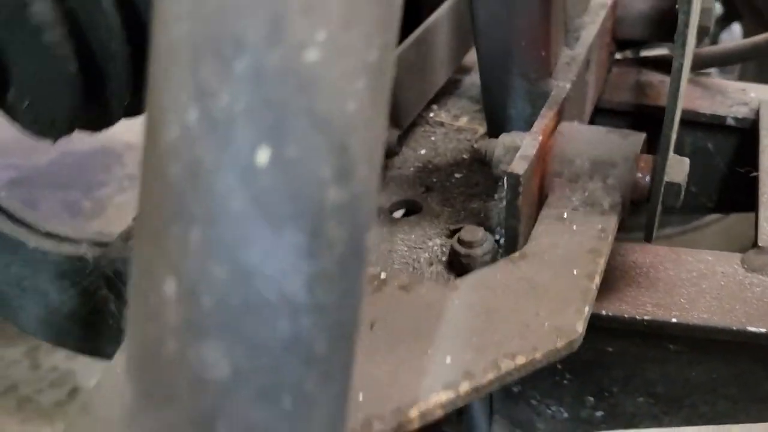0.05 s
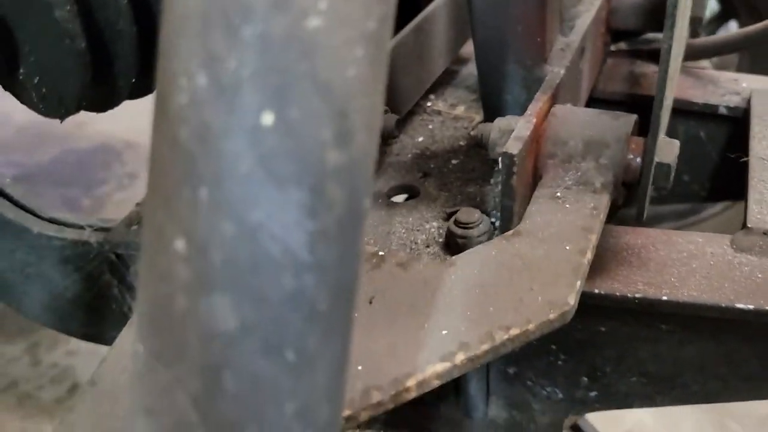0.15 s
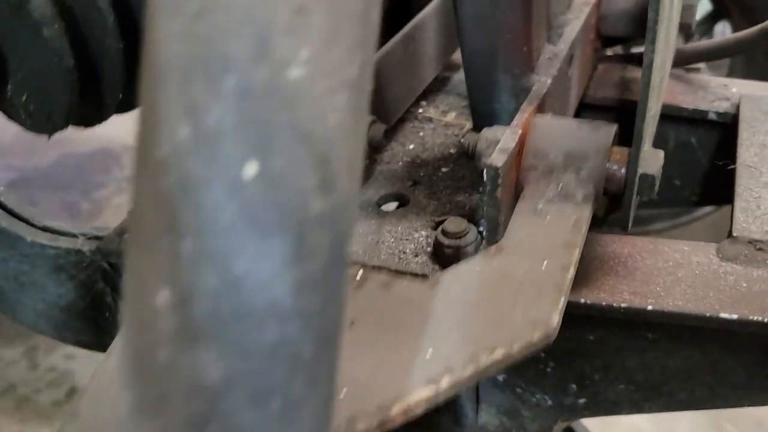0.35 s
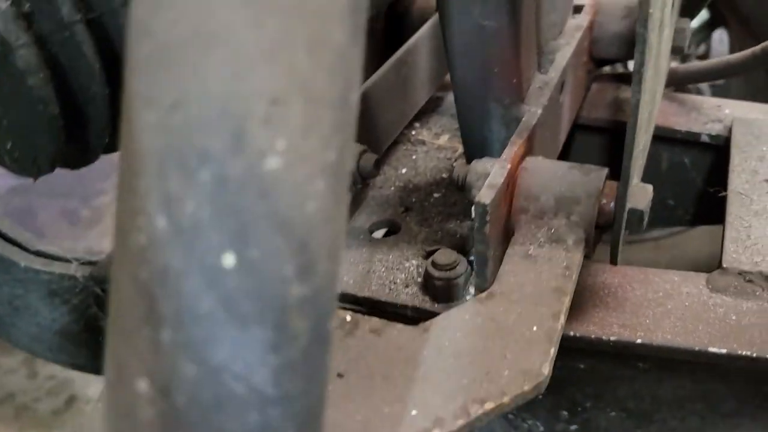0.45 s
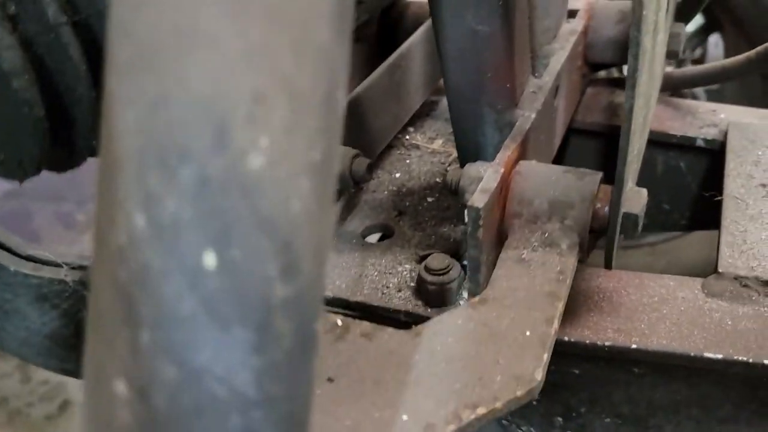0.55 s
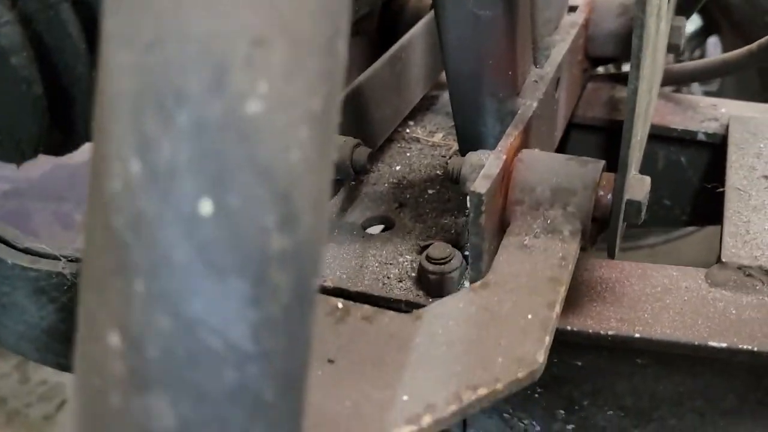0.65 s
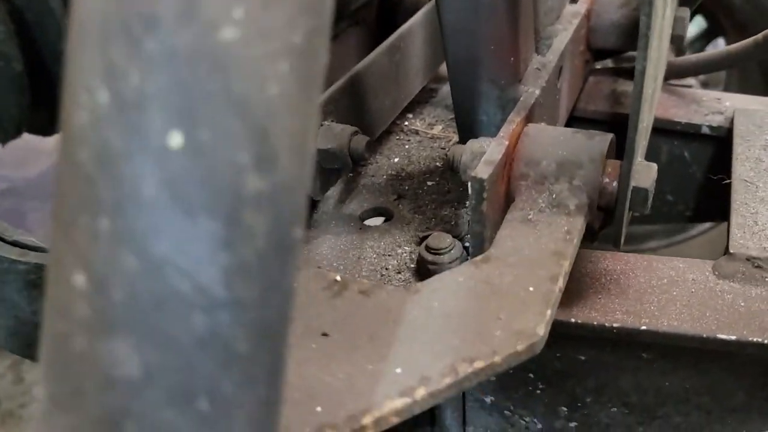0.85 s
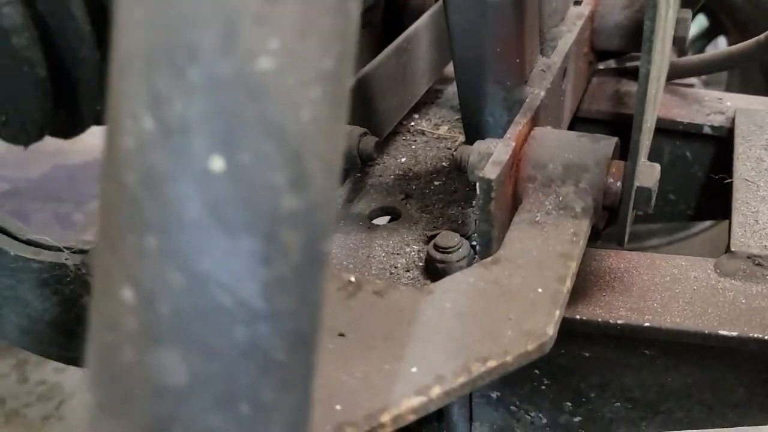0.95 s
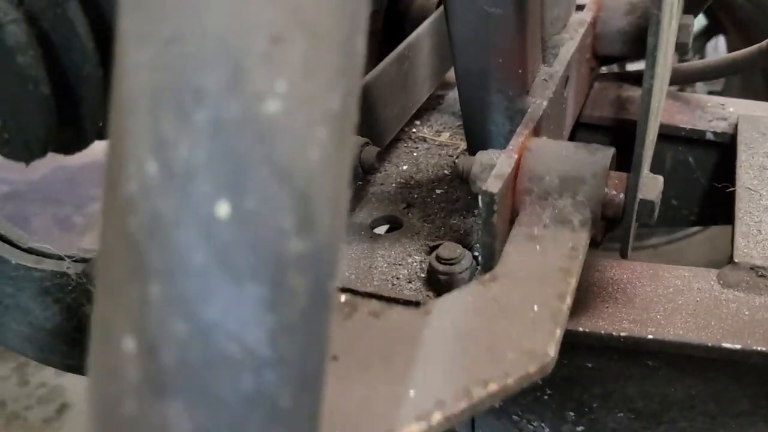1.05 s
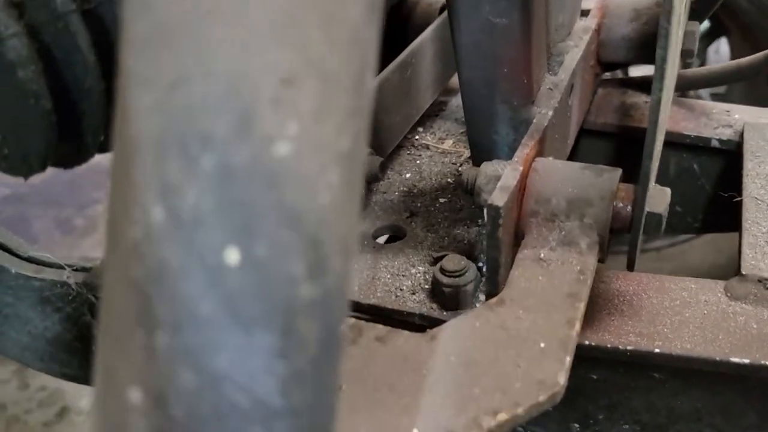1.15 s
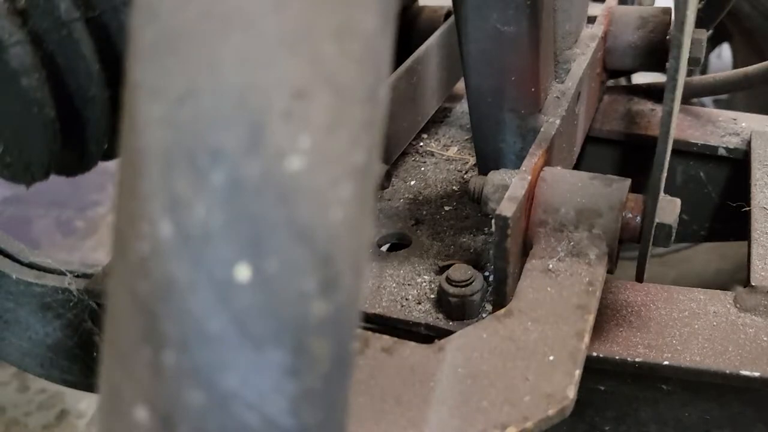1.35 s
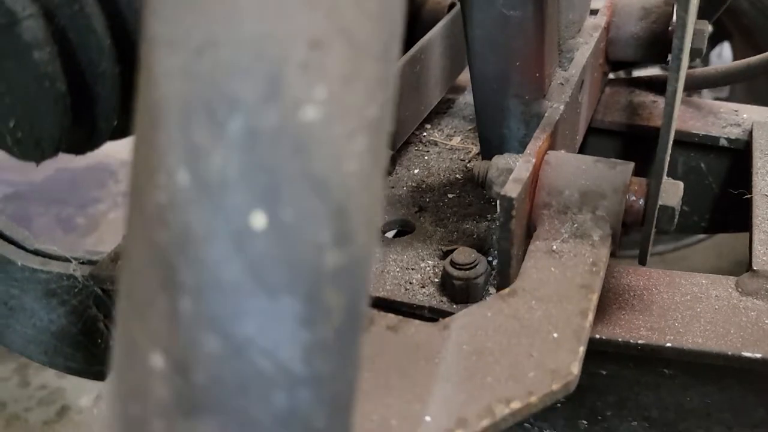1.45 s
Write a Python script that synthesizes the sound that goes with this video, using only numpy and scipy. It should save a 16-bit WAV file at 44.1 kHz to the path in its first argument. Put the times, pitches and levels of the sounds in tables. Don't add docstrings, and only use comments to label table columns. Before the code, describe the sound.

A loose steel suspension arm knocks in its worn mounts, close up. Faint rattles lead to a hard ringing clunk at 0.22 s and a bright rebound at 0.31, then rattles and rubbery thuds until 0.5. Another sharp clank lands at 0.71 with clatter to 0.84, a third slam at 0.99, softer rebound and rattles at 1.1-1.27, then near quiet over faint low rumble and short workshop reverberation.

```python
import sys
import numpy as np
from scipy import signal
from scipy.fft import rfft, irfft
from scipy.io import wavfile
from scipy.ndimage import uniform_filter1d

SR = 44100
rng = np.random.default_rng(int(sys.argv[2]) if len(sys.argv) > 2 else 0)


def boost(x):
    u = np.asarray(x, float) / 20
    return 10 ** u


def dump(signal):
    limited = np.clip(np.atleast_2d(signal).T, -1, 1)
    pcm = np.round(limited * 32767).astype(np.int16)
    wavfile.write(sys.argv[1], SR, pcm)


N = 66150
RING_LEN = 16384
RISE_S, BEAT_HZ = 0.00047, 29.4


# start in seconds, level in dB, chatter length in ms,
# skid before contact in dB, extra dense ringing in dB.
FRONT_KNOCKS = [
    (0.2187, -0.5, 3.9, -16.5, 1),
    (0.9853, 0.5, 11.9, -19, -4),
]
FRONT_HZ = [355, 530, 754, 890, 1130, 1593, 2146, 3440, 3890, 4065, 4570, 4990, 5272, 6306]
# level in dB, t60 in seconds.
FRONT_RING = [(-20, 0.38), (-16, 0.13), (-17, 0.26), (-3, 0.18), (-7.5, 0.05), (-13.5, 0.017), (-10, 0.062),
              (-7, 0.056), (-7.5, 0.095), (-0.5, 0.069), (-22, 0.0073), (-9.5, 0.021), (0.5, 0.051),
              (-2, 0.056)]
# frequency in Hz, level in dB.
FRONT_DENSE = [(120, -10.5), (300, -6), (850, -7.5), (2900, -17), (5300, -6.5), (7600, -29.5), (12700, -37),
               (16000, -51.5)]


def front_knocks():
    return knocks(FRONT_KNOCKS, FRONT_HZ, FRONT_RING, FRONT_DENSE, clear_db=0.5, dense_db=-1.5)


# start in seconds, level in dB, chatter length in ms,
# skid before contact in dB, extra dense ringing in dB.
BACK_KNOCKS = [
    (0.7144, 0.39, 0.5, -15.5, 0),
]
BACK_HZ = [759, 1130, 2008, 2713, 2890, 3440, 3774, 4188, 4969, 5280, 6422, 7364]
# level in dB, t60 in seconds.
BACK_RING = [(-12.5, 0.18), (0.5, 0.054), (-4.5, 0.046), (-6.5, 0.034), (-9, 0.048), (0, 0.029),
             (-10.5, 0.064), (-3.5, 0.051), (-18.5, 0.076), (-11.5, 0.049), (-13.5, 0.033), (-7.5, 0.031)]
# frequency in Hz, level in dB.
BACK_DENSE = [(100, -9), (200, -10), (1100, -4), (3500, -12.5), (6000, -15.5), (8200, -37.5),
              (13200, -31.5), (16000, -46.5)]


def back_knocks():
    return knocks(BACK_KNOCKS, BACK_HZ, BACK_RING, BACK_DENSE, clear_db=1, dense_db=-4)


# start in seconds, level in dB, chatter length in ms,
# skid before contact in dB, extra dense ringing in dB.
REBOUNDS = [
    (0.3082, -1.3, 1.9, -15, -1.5),
]
LATE_REBOUNDS = [
    (1.0951, -11, 9, -32, 0.013),
]
REBOUND_HZ = [400, 1992, 2690, 3440, 3700, 4990, 5240, 7230, 12300]
# level in dB, t60 in seconds.
REBOUND_RING = [(-15.5, 0.26), (-11.5, 0.063), (-13, 0.058), (-12.5, 0.064), (-6.5, .04), (2.5, 0.02),
                (-7.5, 0.053), (-1, 0.027), (-5, .03)]
# frequency in Hz, level in dB.
REBOUND_DENSE = [(170, -8.5), (450, -3.5), (2000, -15), (5100, -13), (8900, -32), (12700, -24),
                 (15000, -30.5), (16000, -46.5)]
LATE_DENSE = [(170, -7), (450, -0.5), (2000, -11.5), (5100, -15), (8900, -41), (12700, -28.5), (15000, -33),
              (16000, -59)]


def rebounds():
    early = knocks(REBOUNDS, REBOUND_HZ, REBOUND_RING, REBOUND_DENSE, clear_db=1, dense_db=1.5)
    late = knocks(LATE_REBOUNDS, REBOUND_HZ[:-1], REBOUND_RING[:-1], LATE_DENSE, clear_db=1, dense_db=1.5)
    return early + late


def knocks(events, pitches, ring, colour, clear_db, dense_db):
    out = np.zeros((2, N))
    hz, (db, t60) = np.array(pitches, float), np.array(ring, float).T
    t60 = np.clip(t60, 0.02, np.minimum(780 / hz, 0.3))
    colour_db = curve(colour, np.fft.rfftfreq(RING_LEN, 1 / SR))
    for s, level_db, ms, skid_db, extra_db in events:
        clear = modes_ring(hz, db, t60)
        clear = unit(ports(clear, 0.33 * np.roll(clear, 40)))
        dense = struck(frame(colour_db), ms)
        add(out, s, boost(level_db) * (boost(clear_db) * clear + boost(dense_db + extra_db) * dense))
        skid(out, s, level_db + skid_db)
    return out


def skid(track, contact_s, level_db):
    skid_s, rise_s, hz = 0.014, 0.015, 4000
    t = np.arange(int(skid_s * SR)) / SR
    scrape = rng.standard_normal((2, len(t))) * np.exp((t - skid_s) / rise_s) * t / skid_s
    scrape = np.pad(scrape, ((0, 0), (0, 400)))
    band = signal.butter(3, [hz * 0.79, hz * 1.37], "band", fs=SR)
    scrape = signal.lfilter(*band, scrape)
    add(track, contact_s - skid_s, boost(level_db) * unit(ports(*scrape)))


def modes_ring(hz, db, t60):
    t = np.arange(RING_LEN) / SR
    twin = hz + BEAT_HZ * rng.standard_normal(len(hz))
    tone = np.sin(2 * np.pi * hz[:, None] * t) + 0.48 * np.sin(2 * np.pi * twin[:, None] * t)
    decay = boost(-60 * t / t60[:, None])
    return np.sum(boost(db)[:, None] * tone * decay, axis=0) * (1 - np.exp(-t / RISE_S))


# frequency in Hz, t60 in seconds.
FRAME_T60 = [(150, 0.22), (800, 0.11), (2500, 0.076), (6000, 0.023), (14000, 0.081)]


def frame(colour_db):
    linger_db, linger_times = -9.5, 4.85
    t, f = np.arange(RING_LEN) / SR, np.fft.rfftfreq(RING_LEN, 1 / SR)
    noise = rfft(rng.standard_normal((2, RING_LEN))) * boost(colour_db)
    out = 0
    for hz in 100 * 2 ** np.arange(0, 7.6, 0.5):
        t60 = curve(FRAME_T60, hz)
        band = np.clip(1 - 2 * np.abs(np.log2(np.maximum(f, 1) / hz)), 0, 1)
        decay = boost(-60 * t / t60) + boost(linger_db - 60 * t / t60 / linger_times)
        out = out + irfft(noise * band) * decay / np.sqrt(t60)
    return out * (1 - np.exp(-t / RISE_S))


def chatter(ms):
    t = np.arange(4096) / SR
    x = rng.standard_normal(4096) ** 3 * np.exp(-t * 2000 / ms)
    x *= 0.41 / np.sqrt(np.sum(x ** 2))
    x[0] = min(2.55 / ms, 1)
    return x


def struck(response, ms):
    rung = signal.fftconvolve(response, chatter(ms)[None], axes=1)[:, :RING_LEN]
    return unit(ports(*rung))


# start in seconds, level in dB, contact pitch in Hz, chatter length in ms,
# spread in octaves.
RATTLES = [(.001, -21, 1480, 31, 1.9), (0.051, -25.5, 2500, 104, 1.6), (.082, -26.5, 3130, 2.8, 0.48),
           (.170, -36, 4460, 5, .8), (.363, -11.5, 2480, 13, 1.5), (.372, -16.5, 9000, 3.6, 1.1),
           (.417, -18, 3070, 11, 1), (0.455, -26, 4540, 16, 0.98), (0.485, -26, 2000, 4.9, 0.6),
           (.540, -44, 11000, 8.4, 0.78), (.620, -26, 1490, 5.16, 2.7), (0.658, -27.5, 6300, 18, 1),
           (0.769, -11.5, 7500, 4.8, 1.2), (0.807, -14, 1700, 14, 0.79), (.838, -25, 1773, 23, 1.6),
           (1.139, -17, 753, 2, 0.58), (1.157, -15.5, 2750, 5.7, 1.45), (1.185, -17.5, 3000, 16, 1.7),
           (1.196, -22, 4800, 8.6, 0.82), (1.435, -46, 3500, 15, 1.55), (1.472, -45, 3000, 8.3, 1.13),
           (1.490, -45.5, 6000, 8, 1.2), (0.772, -20, 2200, 3.3, 0.5), (0.624, -31.5, 1000, 8, 0.67),
           (1.246, -31, 4000, 5.3, 0.6), (1.273, -30.5, 4620, 5.3, 0.65)]
# frequency in Hz, level in dB.
RATTLE_COLOUR = [(150, -26), (800, 5.5), (1950, -5.5), (3000, -7), (4950, -8.5), (9000, -24.5),
                 (12500, -16.5), (16000, -23)]
# pitch in Hz, width in Hz, lift in dB.
RATTLE_PLATES = [(830, 150, 2), (1954, 320, 7.5), (2727, 200, 6), (3460, 250, 4.5), (4880, 270, 1),
                 (6600, 710, 10)]


def rattles():
    out, f = np.zeros((2, N)), np.fft.rfftfreq(RING_LEN, 1 / SR)
    plates_db = sum(db / (1 + (2 * (f - hz) / width) ** 2) for hz, width, db in RATTLE_PLATES)
    for s, level_db, hz, ms, octaves in RATTLES:
        distance = np.log2(np.maximum(f, 1) / hz) / octaves
        near_db = np.maximum(-4.3 * distance ** 2, -32)
        touch = struck(frame(curve(RATTLE_COLOUR, f) + near_db + plates_db), ms)
        add(out, s, boost(level_db - 1) * touch)
    return out


# start in seconds, level in dB, pitch in Hz, t60 in seconds.
PINGS = [(0.362, -16.5, 4150, 0.025), (0.364, -14.5, 1884, 0.033), (.456, -26, 4910, 0.038),
         (0.589, -27, 920, 0.071), (.622, -29, 4990, 0.064), (.660, -42, 3600, .03),
         (0.66, -43, 4700, 0.025), (.805, -12, 1970, 0.03), (1.156, -15, 1901, 0.04),
         (1.204, -27.5, 4970, .03), (.2215, -13, 840, 0.14), (.226, -18, 1130, 0.1),
         (.224, -23.5, 546, .09), (.716, -19, 794, 0.17), (1.186, -27, 2587, 0.067),
         (1.157, -28, 4000, .03), (.221, -36, 1270, 0.074), (.223, -15, 1566, .09),
         (.228, -25.5, 371.3, 0.25), (.278, -26, 338, 0.063), (.988, -12, 830, 0.057),
         (1.097, -19, 2027, 0.075), (.44, -31.5, 830, .15), (.42, -33.5, 274, 0.083),
         (.309, -21.5, 5073, 0.27), (.372, -17.5, 817, 0.067), (.478, -36, 4980, 0.076),
         (.771, -27, 4800, 0.15), (.772, -29.5, 6670, 0.29), (.813, -23, 367.5, 0.066),
         (1.097, -26.5, 5280, 0.072), (1.139, -20.5, 818, 0.051), (1.153, -33, 5140, 0.026),
         (1.196, -27, 5000, 0.041), (1.246, -35, 4970, 0.04), (1.273, -53, 5000, 0.096),
         (1.436, -65.5, 5080, 0.075)]


def pings():
    out, t = np.zeros((2, N)), np.arange(RING_LEN) / SR
    for s, level_db, hz, t60 in PINGS:
        ping = modes_ring(np.array([1. * hz]), np.zeros(1), np.array([t60]))
        ping = ping * (1 - np.exp(-t / 0.0013))
        add(out, s, boost(level_db) * unit(ports(ping, 0 * ping)))
    return out


# start in seconds, level in dB, pitch in Hz, length in ms.
TICKS = [(0.31, -12, 12000, 2.2), (.7705, -20.5, 7700, 5.9), (1.07, -29, 10000, 1),
         (1.134, -35, 12000, 4.6), (1.157, -26.5, 19000, 3.7), (1.185, -28, 17000, 3),
         (.367, -24, 13000, 4), (.90, -47, 12000, 30), (1.44, -56.5, 11500, 25), (1, -37.5, 6900, 5),
         (1.273, -39, 6900, 4), (1.1, -51, 5000, 2.8)]


def ticks():
    out, t = np.zeros((2, N)), np.arange(2048) / SR
    for s, level_db, hz, ms in TICKS:
        burst = rng.standard_normal((2, 2048)) * np.exp(-t * 1000 / ms)
        band = signal.butter(1, [hz * 0.57, min(hz * 1.3, 16000)], "band", fs=SR)
        burst = signal.lfilter(*band, burst)
        add(out, s, boost(level_db) * unit(ports(*burst)))
    return out


# start in seconds, level in dB, pitch in Hz, t60 in seconds.
THUDS = [(0.31, -15.5, 177, 0.12), (0.337, -6, 163, 0.042), (0.392, -18, 74, 0.058),
         (0.418, -26, 68, 0.041), (.432, -22, 67, 0.18), (.93, -30.5, 100, 0.087), (0.717, -23, 174, 0.11),
         (0.813, -29, 98, 0.034), (1.11, -20.5, 164, 0.12), (1.14, -22, 166.5, 0.21),
         (1.169, -24, 100, 0.16), (1.224, -23, 84, 0.059)]


def thuds():
    out, t = np.zeros(N), np.arange(RING_LEN) / SR
    for s, level_db, hz, t60 in THUDS:
        blow = np.sin(2 * np.pi * hz * t) * (1 - np.exp(-t / 0.0058))
        add(out, s, boost(level_db - 60 * t / t60) * blow)
    return out


# time in seconds, level in dB.
SWAY = [(0.0, -33), (0.06, -35), (0.228, -45), (0.43, -25.5), (0.466, -39.5), (0.706, -41), (0.768, -29),
        (1.047, -51.5), (1.158, -25.5), (1.5, -52.5)]
# pitch in Hz, level in dB, t60 in seconds.
SWAY_MODES = [(32.7, -22, 0.051), (51.7, -3, 0.32), (63, -11.5, 0.15), (82.7, -3.5, 0.2), (98, -11, 0.22),
              (177, -10.5, 0.064), (344.3, -8, 0.03), (393, -28, 0.15)]


def sway():
    s, level_db = np.array(SWAY).T
    f = np.fft.rfftfreq(N, 1 / SR)
    shape = sum(boost(db) / np.sqrt(t60) / (1j * (f - hz) + 1.74 / t60) for hz, db, t60 in SWAY_MODES)
    shape = shape * f / (f + 30) / (1 + (f / 600) ** 2)
    mid, side = irfft(rfft(rng.standard_normal((2, N))) * shape, N)
    both = mid + boost(-13) * side * np.array([[1], [-1]])
    slow = np.sqrt(uniform_filter1d(np.mean(both ** 2, axis=0), size=4000))
    return both / slow * boost(np.interp(np.arange(N) / SR, s, level_db))


def room(metal):
    t60_s, dull_hz = 0.55, 9000
    t = np.arange(SR // 2) / SR
    tail = rng.standard_normal((2, len(t))) * boost(-60 * t / t60_s) * (1 - np.exp(-t / 0.0027))
    tail = signal.lfilter(*signal.butter(1, dull_hz, fs=SR), tail)
    tail = tail / np.sqrt(np.sum(tail ** 2) / 2)
    return boost(-18) * signal.fftconvolve(metal, tail, axes=1)[:, :N]


# frequency in Hz, level in dB.
SHOP = [(150, -35), (250, -5), (421, -1), (674, -19), (875, -5), (971, -15), (16000, -52)]


def shop():
    f = np.fft.rfftfreq(N, 1 / SR)
    shape = boost(curve(SHOP, f)) * (f > 250)
    x = irfft(rfft(rng.standard_normal((2, N))) * shape, N)
    return x * boost(-55) / x.std()


# frequency in Hz, left over right in dB.
PORT_BALANCE = [(150, -1.5), (600, 0.6), (1400, -3.5), (2800, -4), (5300, -9.5), (8500, 5), (14000, -3.5)]


def ports(x, other):
    right_lag_s, unlike = 0.000347, 0.94
    f = np.fft.rfftfreq(len(x), 1 / SR)
    pan = boost(curve(PORT_BALANCE, f) / 2)
    shared = rfft(x)
    unshared = rfft(other) * unlike * np.clip(f / 88.0, 0, 1)
    left = (shared + unshared) * pan
    right = (shared - unshared) / pan * np.exp(-2j * np.pi * f * right_lag_s)
    return irfft(np.array([left, right]), len(x))


def curve(table, hz):
    f, v = np.array(table, float).T
    return np.interp(np.log(np.maximum(hz, 1)), np.log(f), v)


def unit(x):
    return x / np.abs(x).max()


def add(track, s, x):
    i = max(int(s * SR), 0)
    fade = np.minimum(np.arange(x.shape[-1])[::-1] / 200, 1)
    track[..., i:i + x.shape[-1]] += (x * fade)[..., :N - i]


def scene():
    metal = front_knocks() + back_knocks() + rebounds() + rattles() + pings() + ticks()
    return metal + room(metal) + thuds() + sway() + shop()


def low_pass(x):
    return signal.sosfilt(signal.butter(12, 16660, fs=SR, output="sos"), x)


def record(dry):
    low_hz, top_hz = 33.9, 15600
    x = signal.sosfilt(signal.butter(2, low_hz, "high", fs=SR, output="sos"), dry)
    x = np.tanh(x * 0.8) / 0.85
    x = signal.sosfilt(signal.butter(10, top_hz, fs=SR, output="sos"), x)
    return low_pass(x)


dry = scene()
out = record(dry)
dump(out)
```